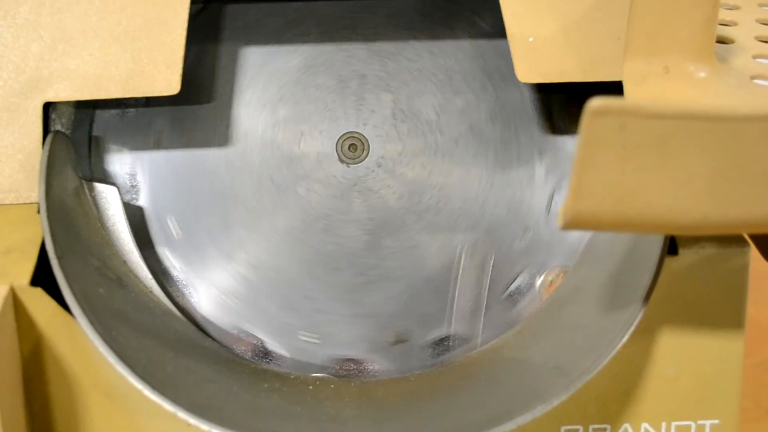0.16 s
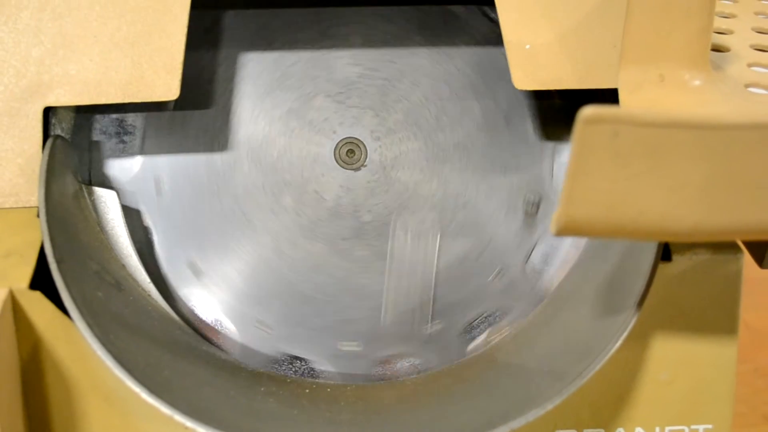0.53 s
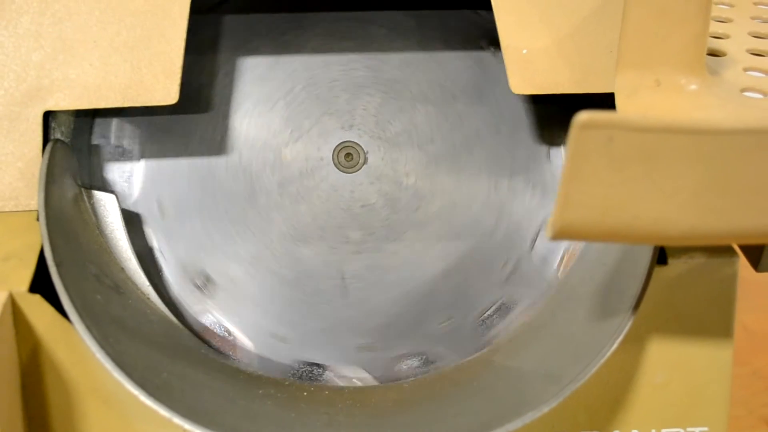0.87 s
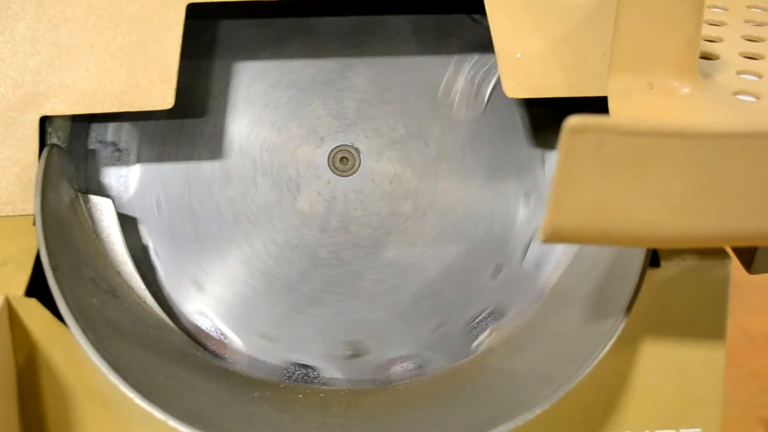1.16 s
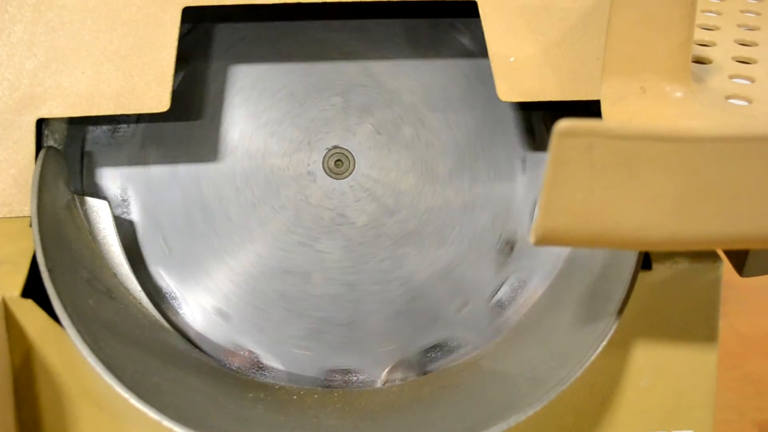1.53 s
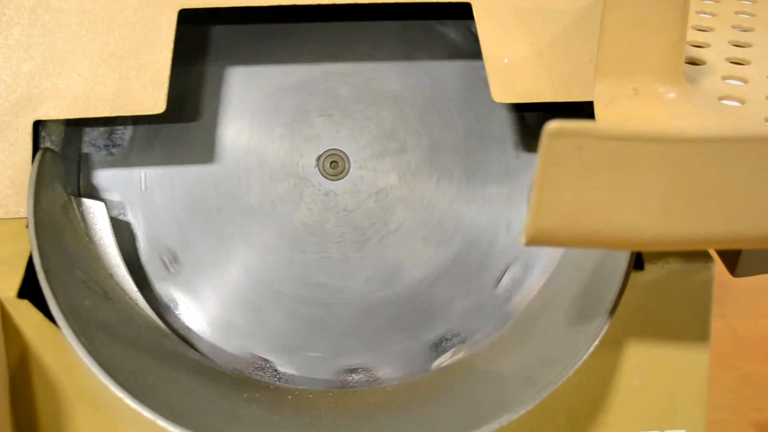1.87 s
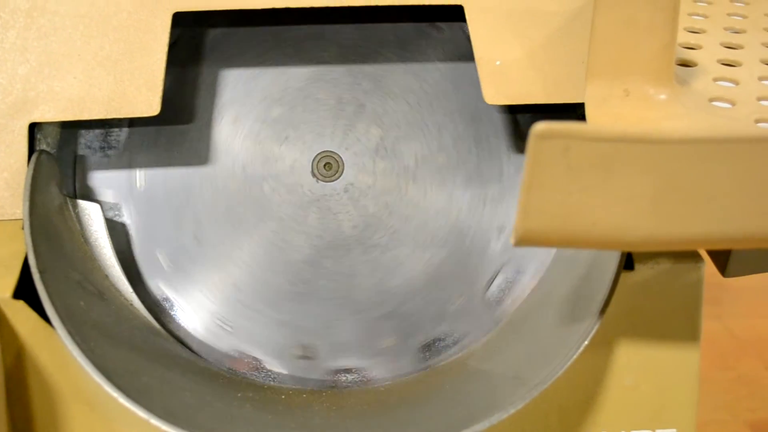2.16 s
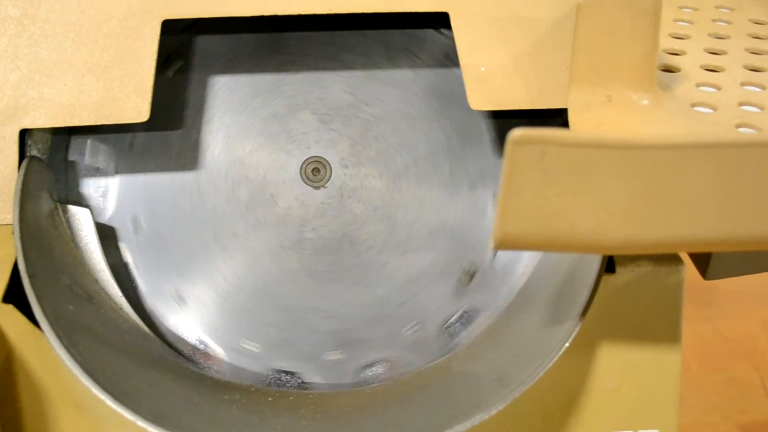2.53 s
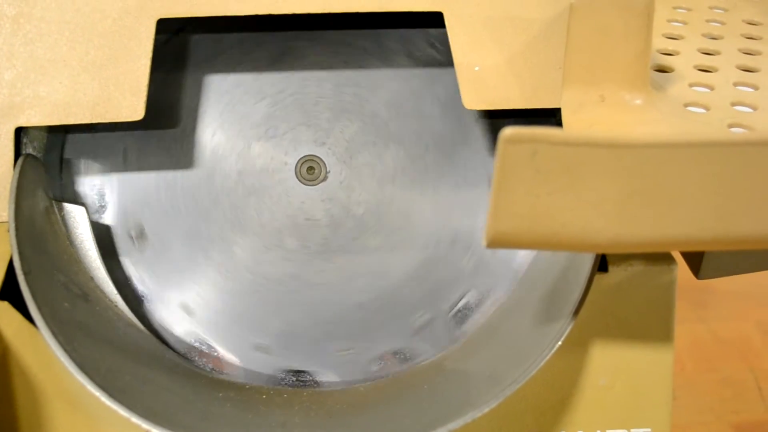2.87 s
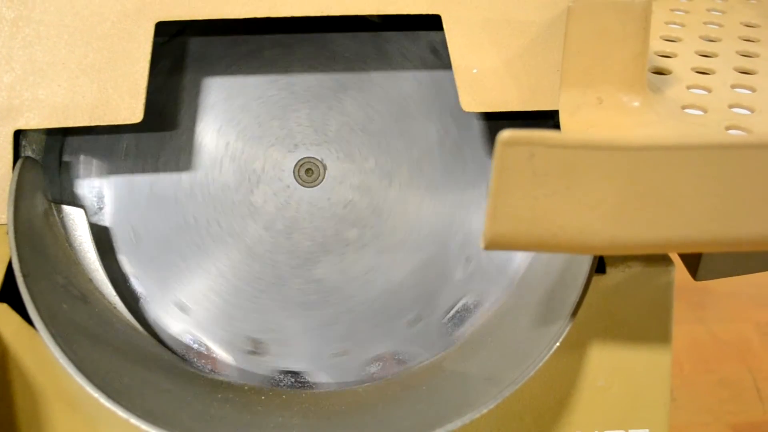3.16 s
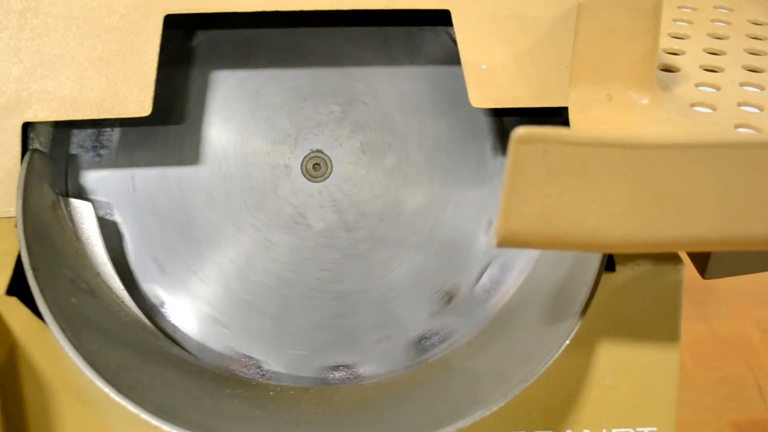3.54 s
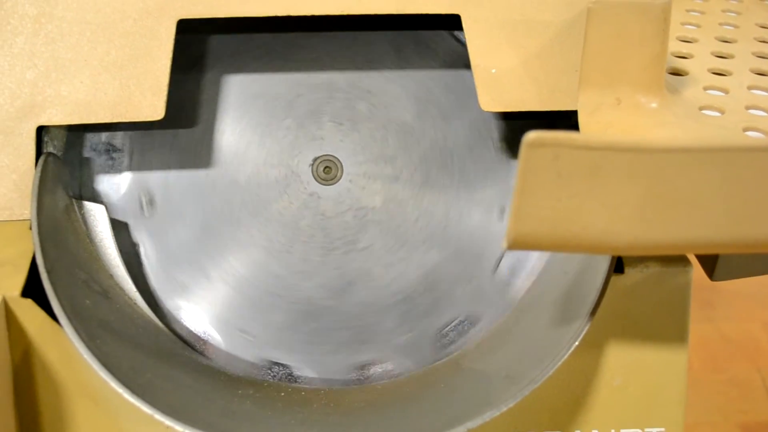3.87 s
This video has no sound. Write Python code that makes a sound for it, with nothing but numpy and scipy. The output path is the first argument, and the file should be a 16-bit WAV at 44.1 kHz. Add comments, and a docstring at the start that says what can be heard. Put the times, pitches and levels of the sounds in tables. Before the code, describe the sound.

Coin clatter in a sorting machine, dense and bright at first, then sparser, over faint motor whirr

```python
"""In a coin sorter, heard close from above: coins tumble on its spinning steel disc.
Each hit is a short chatter of contacts that rings disc, bowl and plastic housing: damped tones and noise bands.
Every hit adds clinks and a bright tick, some coins sing on in the air, and a few clank or snap together.
Small rattles follow the hits, over a whirr of disc and motor made from flickering noise bands."""
import sys
import numpy as np
from scipy import signal
from scipy.io import wavfile
from scipy.ndimage import uniform_filter1d

SR = 44100
rng = np.random.default_rng(int(sys.argv[2]) if len(sys.argv) > 2 else 0)


def transcribe(signal):
    """Save signal, clipped to [-1, 1], as a 16-bit WAV file at the path in sys.argv[1]."""
    frames = np.atleast_2d(signal).T
    limited = np.clip(frames, -1, 1)
    pcm = np.round(limited * 32767).astype(np.int16)
    wavfile.write(sys.argv[1], SR, pcm)


N = 176400  # samples, 4 s

# Coin hits. Each row: start in seconds, strength in dB,
# thud of the housing in dB relative to the strength (before THUD_DB is added).
COIN_HITS = [(0.001, -10.5, -6.5), (0.025, -6.5, -7.5), (0.037, -4.5, -16), (0.071, -6, -56),
             (0.1, -11, -24), (0.149, -2.5, -25), (0.207, -4, -30), (0.238, -14, -12), (0.262, -9, -2.5),
             (0.317, -12, -5), (0.358, -9, -8), (0.414, -5.5, -4.5), (0.449, -3, -9.5), (0.551, -7.5, -7),
             (0.591, 1, -12), (0.716, -10, -1), (0.744, -14.5, 1), (0.801, -6, -8), (0.855, -8.5, -4),
             (0.873, -8, -1.5), (0.904, -6, -6.5), (0.972, -11.5, -3.5), (1.004, -9.5, -3.5),
             (1.021, -8.5, -1.5), (1.056, -4, -9.5), (1.118, -13.5, -5.5), (1.142, -8.5, -9.5),
             (1.24, -3, -13.5), (1.266, -2.5, -25), (1.2858, -4.5, -18), (1.3398, -4.5, -25),
             (1.418, -6.5, -33), (1.427, -23, -22), (1.461, -6, -8.5), (1.485, -12, -1.5), (1.509, -5, -26),
             (1.522, -2, -36), (1.567, -7, -15), (1.617, -11.5, -5), (1.664, -3.5, -12.5),
             (1.757, -16.5, -11), (1.781, -14.5, -12), (1.832, -22.5, -7), (1.983, -15.5, -14),
             (2.059, -15.5, -6), (2.088, -11.5, -23), (2.121, -4, -25), (2.163, -10.5, -3),
             (2.253, -21.5, -2.5), (2.309, -17.5, -13), (2.53, -10, -3.5), (2.56, -15, 1),
             (2.573, -24.5, 9), (2.637, -21.5, 2.5), (2.668, -9.5, -2.5), (2.733, -14, -10),
             (2.782, -15.5, -7), (2.809, -15, -11.5), (2.867, -15, -8), (2.961, -6, -12),
             (3.052, -11.5, -4), (3.06, -2.5, -23.5), (3.106, -11.5, -27), (3.122, -10, -35),
             (3.145, -16, -30), (3.163, -6.5, -16.5), (3.191, -11.5, -40), (3.287, -11.5, -0.5),
             (3.314, -14, 1), (3.394, -12, -4.5), (3.426, -12.5, -0.5), (3.646, -23.5, -14),
             (3.704, -9.5, -13), (3.83, 0.5, -14), (3.9, -7.5, -30), (3.944, -15.5, -28), (3.991, -13, -31)]
BANDS_HZ = 50 * 2 ** (np.arange(24) / 3)  # centres of third-octave bands

# contacts: mean gap and mean level of the chatter, and the small bounces after the hits
CHATTER_S, CHATTER_DB = .003, -11
RATTLES_PER_S, RATTLE_DB, RATTLE_SPREAD_DB, SETTLE_T60_S = 150, -19.5, 9, 0.49
# thud: lift, highest frequency, extra weight toward the bass; dB of treble lost per dB of thud
THUD_DB, THUD_TOP_HZ, THUD_DEPTH, DULL = 8.5, 1600, .2, 0.083
# clear tones rung by every contact
TONE_DB, TONE_SCATTER_DB, TONE_T60_S = -18.5, 6.5, .06
# dense tones: decay times hold at 2 kHz and get shorter above
CLATTER_DB, CLATTER_SCATTER_DB, CRACK_T60_S = -13.5, 2.5, .024
TAIL_DB, TAIL_T60_S, T60_SLOPE = -8.5, 0.13, -0.19
RISE_S, RISE_CYCLES = 0.0017, 7.6  # build-up: a fixed time plus some cycles
CLINK_DB, CLINK_LOW_HZ, CLINK_HIGH_HZ, CLINK_T60_S = -15.5, 1513, 6020, .04  # mean decay time
TUMBLE_DB, GRAZE_DB, GRAZES = 3, 6, 120  # throb, loss at a touch, number of light touches
CLANK_PAIR, CLANK_T60_S = 1.09, 0.059  # pitch of the second tone relative to the first
SNAP_T60_S, TICK_DB = 0.0067, -5.5  # strongest tick relative to its hit
WHIRR_DB, FLICKER_DB = -45, 1.5
MIC_LOW_HZ, DIP_HZ, DIP_Q, ROLL_HZ, KNEE_HZ, TOP_HZ = 117, 7840, 14.8, 9440, 11700, 15800


def undb(db):
    """Turn dB into a plain amplitude factor."""
    return 10 ** (np.asarray(db) / 20)


def colour(table, hz):
    """Read a spectrum table in dB at a frequency, on a logarithmic scale of pitch."""
    points = np.array(table)
    return np.interp(np.log(hz), np.log(points[:, 0]), points[:, 1])


def train(t, gain):
    """Place impulses of the given sizes at the given times."""
    samples = np.clip(np.round(t * SR).astype(int), 0, N - 1)
    return np.bincount(samples.ravel(), gain.ravel(), N)


def fade(x, t60):
    """Let every impulse die away exponentially, by 60 dB in t60 seconds."""
    return signal.lfilter([1], [1, -1000 ** (-1 / (t60 * SR))], x)


def mode(x, hz, t60):
    """Turn every impulse into a damped oscillation, without bass spill."""
    radius = 1000 ** (-1 / (t60 * SR))
    angle = 2 * np.pi * hz / SR
    ring = signal.lfilter([1, -1], [1, -2 * radius * np.cos(angle), radius * radius], x)
    return ring * np.sin(angle) / (2 * np.sin(angle / 2))


def band(hz):
    """Make third-octave noise with an rms of 1."""
    edges = [hz / 2 ** (1 / 6), hz * 2 ** (1 / 6)]
    band_pass = signal.butter(2, edges, "band", fs=SR, output="sos")
    noise = signal.sosfilt(band_pass, rng.standard_normal(N))
    return noise / noise.std()


def walk(rate):
    """Draw random levels, rate of them a second, and glide from one to the next."""
    hold = int(SR / rate)
    steps = np.repeat(rng.standard_normal(N // hold + 1), hold)
    return uniform_filter1d(steps, hold)[:N]


def contacts():
    """List hits and the small bounces that follow them; each chatters through four contacts."""
    hits = np.array(COIN_HITS)
    chance = rng.random((1600, 2))
    t = np.cumsum(-np.log(chance[:, 0])) / RATTLES_PER_S
    # bounces are stronger soon after strong hits
    unrest = fade(train(hits[:, 0], undb(hits[:, 1])), SETTLE_T60_S) + 1e-3
    db = 20 * np.log10(np.interp(t * SR, np.arange(N), unrest)) + RATTLE_DB
    db = db + RATTLE_SPREAD_DB * (2 * chance[:, 1] - 1)
    no_thud = np.full(len(t), -THUD_DB)
    bounces = np.c_[t, db, no_thud][t < N / SR]
    rows = np.vstack([hits, bounces])

    late = 2 * rng.random((len(rows), 2, 4))
    first = np.arange(4) == 0
    times = rows[:, :1] + CHATTER_S * np.cumsum(late[:, 0], axis=1) * ~first
    gain = undb(rows[:, 1:2]) * np.where(first, 1, undb(CHATTER_DB) * late[:, 1])
    return rows, times, gain


def tilt_db(rows, hz):
    """Give hits nearer the housing more thud and less treble."""
    low = np.clip(np.log2(THUD_TOP_HZ / hz) * 2 + 1, 0, 1) * (THUD_TOP_HZ / hz) ** THUD_DEPTH
    high = np.clip(np.log2(hz / THUD_TOP_HZ / 2), 0, 1)
    return (low - DULL * high) * np.maximum(rows[:, 2] + THUD_DB, -12)


def disc():
    """Contacts ring a few clear tones and, band by band, the dense ones: a crack and a tail."""
    # Clear tones of housing and disc, plus a high coin tone (9300 Hz), rung by every contact.
    # Each row: frequency in Hz, level in dB before TONE_DB.
    clear_tones = [(290, -19), (550, -12), (680, -13.5), (1290, -10.5), (1730, -6.5), (2065, -9),
                   (2680, -14), (3620, -10), (4720, -10.5), (9300, -6)]
    # Colour of the dense tones. Each row: frequency in Hz, level in dB before CLATTER_DB and band width.
    clatter_spectrum = [(160, -24), (860, -17.5), (1160, -3), (1500, -16.5), (3500, -9.5), (7000, -15),
                        (11000, -12)]
    rows, times, gain = contacts()
    out = np.zeros(N)
    for hz, db in clear_tones:
        scatter = TONE_SCATTER_DB * np.clip(rng.standard_normal(len(rows)), -2, 1)
        each = db + TONE_DB + tilt_db(rows, hz) + scatter
        sign = rng.choice([-1, 1], gain.shape)
        out += mode(train(times, gain * sign * undb(each)[:, None]), hz, TONE_T60_S)
    for hz in BANDS_HZ[4:]:
        width_db = 10 * np.log10(hz / 2000)  # higher bands are wider
        each = colour(clatter_spectrum, hz) + width_db + CLATTER_DB + tilt_db(rows, hz)
        each = each + CLATTER_SCATTER_DB * rng.standard_normal(len(rows))
        strikes = train(times, (gain * undb(each)[:, None]) ** 2)
        slow = (hz / 2000) ** T60_SLOPE / 2  # halved because fade acts on power here
        crack = fade(strikes, CRACK_T60_S * slow)
        tail = undb(2 * TAIL_DB) * fade(strikes, TAIL_T60_S * slow)
        rise = int(SR * (RISE_S + RISE_CYCLES / hz)) // 2 * 2 + 1
        # averaging over the past only makes the power build up gradually
        power = uniform_filter1d(crack + tail, rise, origin=rise // 2)
        out += band(hz) * np.sqrt(np.abs(power))
    return out


def clinks():
    """Every hit lands differently and rings four short tones of its own on the steel."""
    rows = np.array(COIN_HITS)
    chance = rng.random((len(rows), 3, 4, 1))
    t = np.arange(4000) / SR
    hz = CLINK_LOW_HZ * (CLINK_HIGH_HZ / CLINK_LOW_HZ) ** chance[:, 0]
    decay = 1000 ** (-t / (CLINK_T60_S * (.5 + chance[:, 1])))
    ring = np.sin(2 * np.pi * hz * t) * decay * chance[:, 2]
    return train(rows[:, :1] + t, ring.sum(axis=1) * undb(rows[:, 1:2] + CLINK_DB))


def coins():
    """A struck coin sings on high tones; it throbs as it tumbles, and every hit or graze breaks the ring."""
    # Coins that sing on. Each row: start in seconds, number of the tone list below, strength in dB.
    coin_rings = [(0.023, 0, -16.5), (0.137, 0, -19), (.319, 1, -13), (.611, 1, -20), (1.169, 1, -27),
                  (1.338, 0, -21.5), (1.34, 2, -32), (1.425, 0, -14.5), (1.986, 1, -22.5),
                  (2.733, 0, -23.5), (2.961, 1, -27.5), (3.063, 1, -18.5), (3.707, 0, -28.5)]
    # Tones of two coin kinds, a list each, then a lower tone of the first kind that rings only once.
    # Each row: frequency in Hz, level in dB, time to fade by 60 dB in seconds.
    coin_tones = [
        [(8555, -2, .4), (9015, 0, .4)],
        [(9230, -1, .2), (9340, 0, .2)],
        [(6700, 0, .12)],
    ]
    out = np.zeros(N)
    hit_samples = np.array(COIN_HITS)[:, 0] * SR
    touches = np.sort(np.r_[hit_samples, N * rng.random(GRAZES)])
    since = np.searchsorted(touches, np.arange(N))  # number of touches so far
    for number, tones in enumerate(coin_tones):
        struck = np.array([r for r in coin_rings if round(r[1]) == number])
        for hz, db, t60 in tones:
            # each touch draws a new sign and level for the ring
            chance = rng.standard_normal(len(touches) + 1)[since]
            share = np.sign(chance) * undb(TUMBLE_DB * walk(70) - GRAZE_DB * np.abs(chance))
            out += mode(train(struck[:, 0], undb(struck[:, 2] + db)), hz, t60) * share
    return out


def knocks():
    """Clanks are softly struck pairs of tones; snaps and ticks are short, bright bursts of noise."""
    # Hollow clanks of a coin on the chute. Each row: start in seconds, pitch in Hz, strength in dB.
    clank_strikes = [(0.974, 1175, -17.5), (1.298, 612, -32), (1.428, 630, -32), (1.462, 613, -34),
                     (3.395, 1177, -18)]
    # Coins snapping edge-on against each other. Each row: start in seconds, strength in dB.
    edge_snaps = [(.008, -5.5), (.055, -5), (.065, -17), (.134, -5.5), (.161, -18), (.611, -7), (1.2962, 4)]
    clank = np.zeros(N)
    for start, hz, db in clank_strikes:
        strike = train(np.array(start), undb(db))
        for ratio in (1, CLANK_PAIR):
            clank += mode(strike, hz * ratio, CLANK_T60_S)
    clank = signal.lfilter(np.hanning(25) / 8, [1], clank)  # softens the strike

    ticks = np.array(COIN_HITS)[:, :2] + [0, TICK_DB]  # at the front of every hit
    bursts = np.vstack([edge_snaps, ticks])
    hard = np.r_[np.ones(len(edge_snaps)), rng.random(len(ticks))]
    envelope = fade(train(bursts[:, 0], undb(bursts[:, 1]) * hard), SNAP_T60_S)
    snap = envelope * rng.choice([-1, 1], N)
    return clank + np.diff(snap, prepend=0)  # differences brighten the noise


def whirr():
    """Disc, bearings and motor: noise bands that swell together and flicker alone."""
    # Colour of the whirr. Each row: frequency in Hz, relative level in dB before band width.
    whirr_spectrum = [(100, -0.5), (470, 8.5), (1150, 12.5), (2200, 7), (6000, -11), (11000, -11.5)]
    swell = walk(6.5)
    total = np.zeros(N)
    for hz in BANDS_HZ:
        flicker_db = FLICKER_DB * (swell + walk(23.8))
        total += band(hz) * undb(colour(whirr_spectrum, hz) + 10 * np.log10(hz) + flicker_db)
    return total / total.std() * undb(WHIRR_DB)


def scene():
    """Add all the sources into one channel."""
    return (disc() + clinks() + coins() + knocks() + whirr())[None]


def record(dry):
    """The microphone lacks bass, dips near 8 kHz and rolls off steeply at the top."""
    x = signal.sosfilt(signal.butter(2, MIC_LOW_HZ, "high", fs=SR, output="sos"), dry)
    x = signal.lfilter(*signal.iirnotch(DIP_HZ, DIP_Q, SR), x)
    x = signal.sosfilt(signal.butter(4, ROLL_HZ, fs=SR, output="sos"), x)
    x = signal.sosfilt(signal.cheby2(6, 24, KNEE_HZ, fs=SR, output="sos"), x)
    return signal.sosfilt(signal.ellip(8, .2, 70, TOP_HZ, fs=SR, output="sos"), x)


dry = scene()
out = record(dry)
transcribe(out)
```